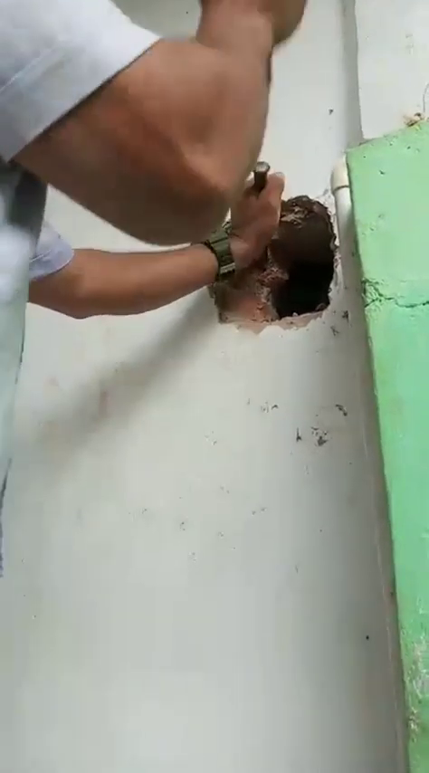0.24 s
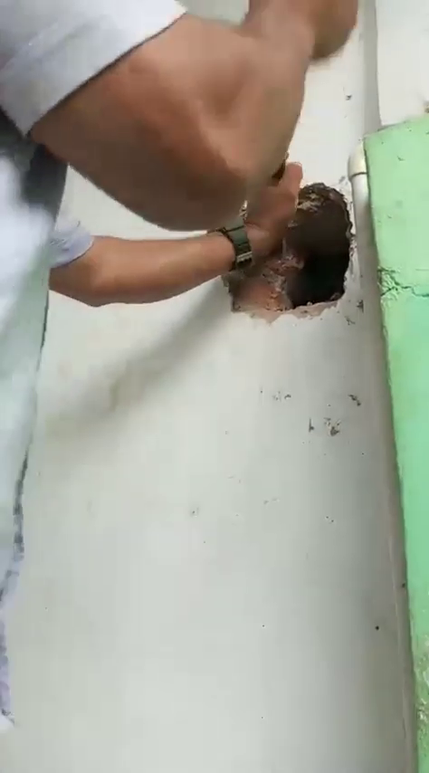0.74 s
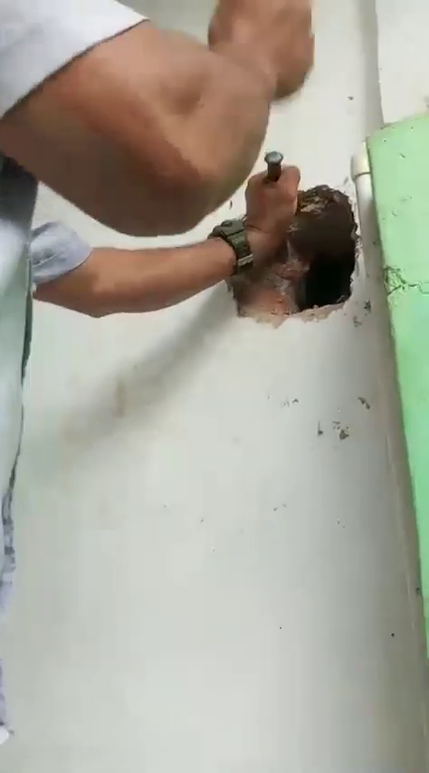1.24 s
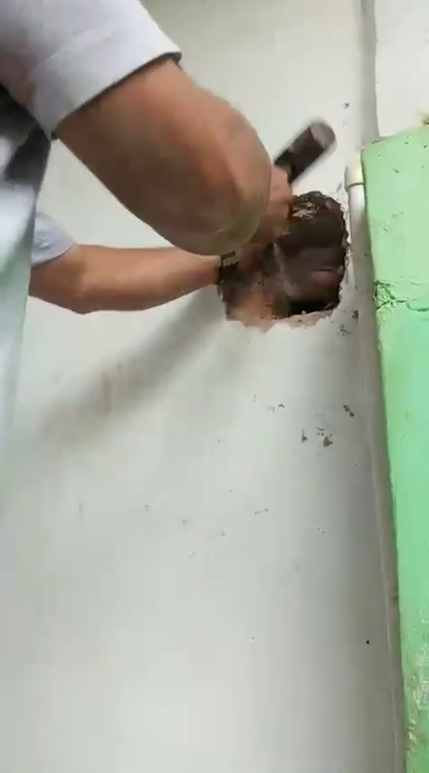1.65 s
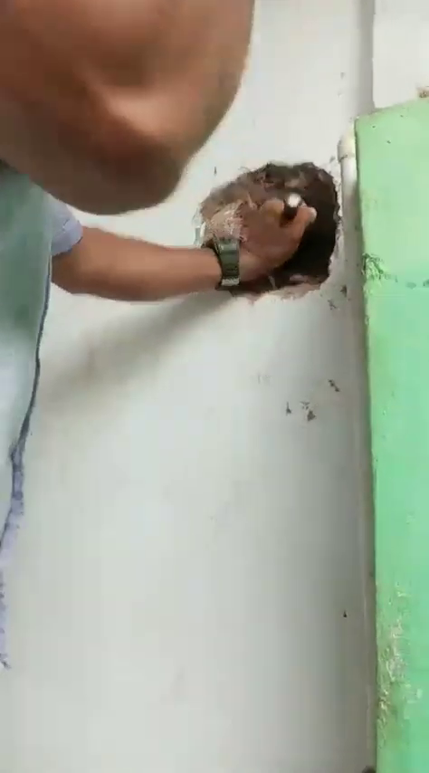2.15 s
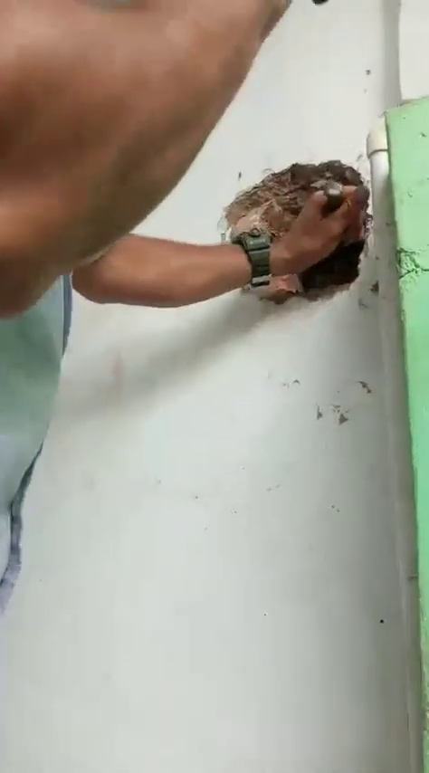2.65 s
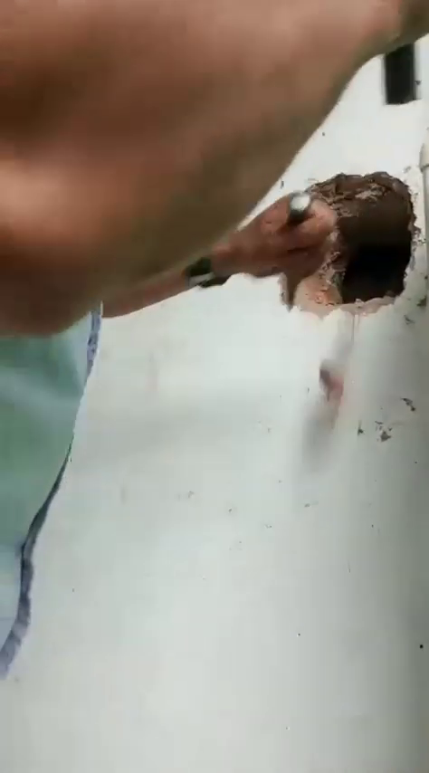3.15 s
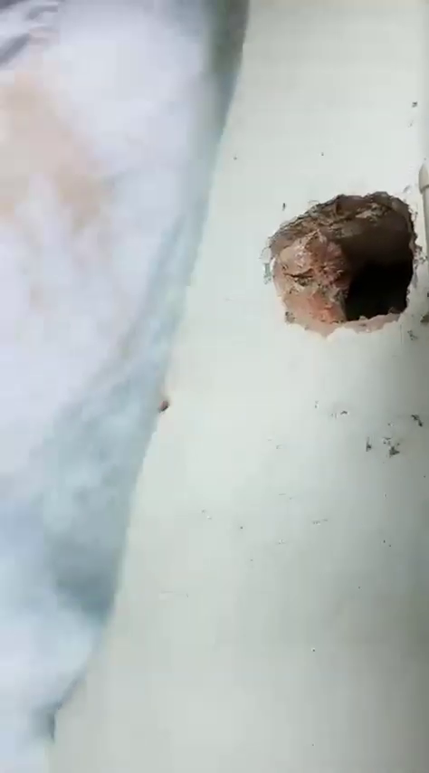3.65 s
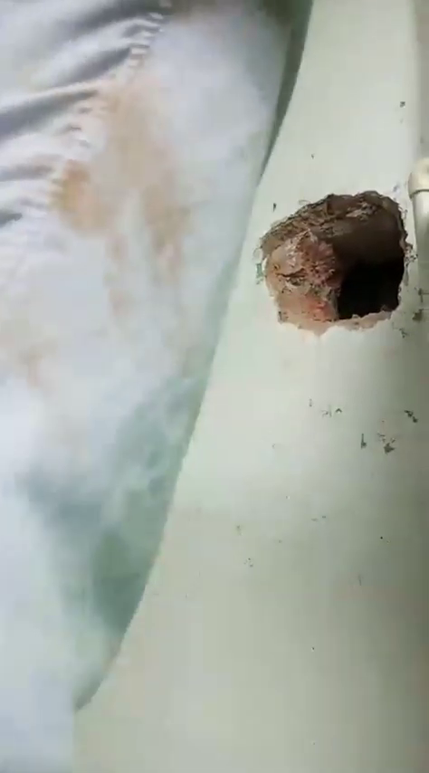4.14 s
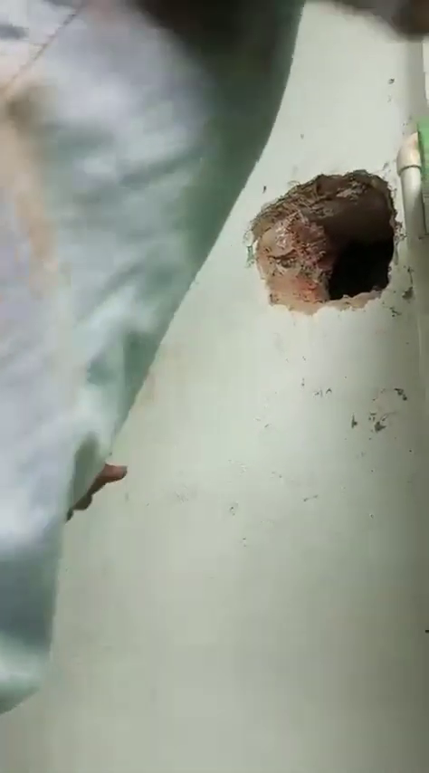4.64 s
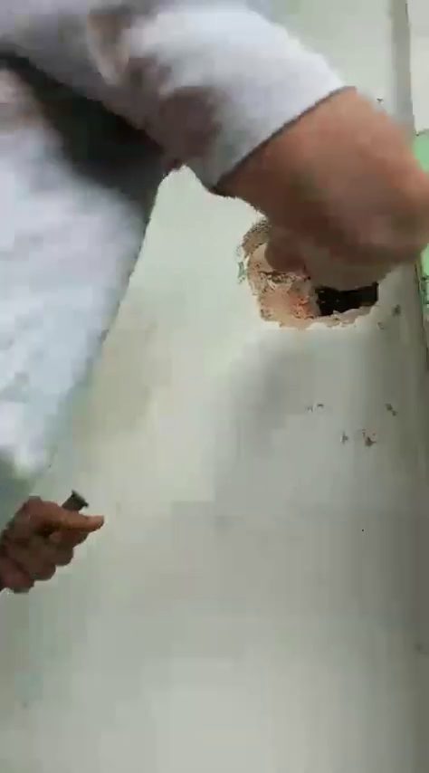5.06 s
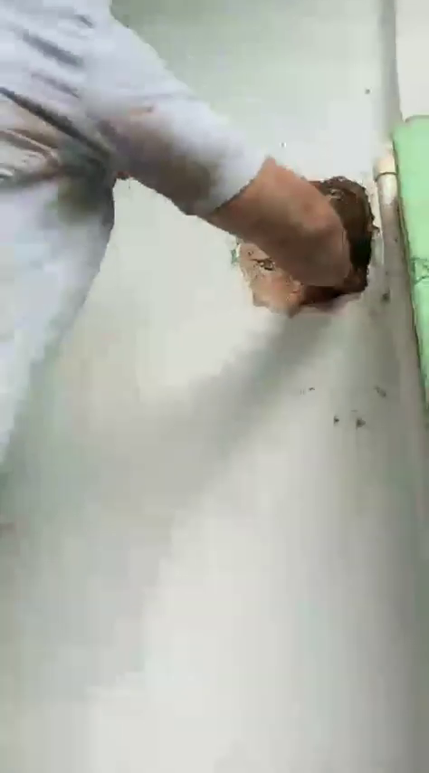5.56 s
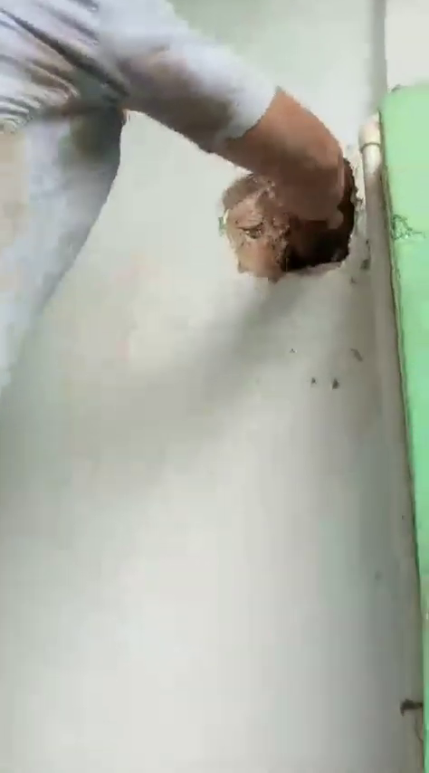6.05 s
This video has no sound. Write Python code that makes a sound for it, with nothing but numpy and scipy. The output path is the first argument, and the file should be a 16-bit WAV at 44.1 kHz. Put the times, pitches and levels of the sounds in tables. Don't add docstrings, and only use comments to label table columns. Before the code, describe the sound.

In a bare echoing room, a hammer strikes a steel chisel four times, about half a second apart, each a hard crack with a brief ring, hollow wall boom and crumbling plaster. Chips fall and the chisel ticks. Then the tools knock down loudly on the floor and a hand softly rakes rubble, over a faint low motor hum. Close phone microphone, blows squashed.

```python
import sys
import numpy as np
from scipy import signal
from scipy.fft import rfft, irfft, next_fast_len
from scipy.io import wavfile
from scipy.ndimage import uniform_filter1d, map_coordinates

SR = 44100
rng = np.random.default_rng(int(sys.argv[2]) if len(sys.argv) > 2 else 0)


def store_pcm(level_fs):
    pcm = np.round(np.clip(level_fs, -1, 1) * 32767).astype(np.int16)
    wavfile.write(sys.argv[1], SR, np.atleast_2d(pcm).T)


def ratio_of_db(decibels):
    return 10 ** (np.asarray(decibels, float) / 20)


N = 278263

# (time [s], peak [dB], wall boom [dB], steel ring [dB], crumble [dB])
BLOWS = [
    (1.018, -8.5, 2, 3.5, 0.5),
    (1.5264, -5, 3.5, -1, -1),
    (2.0279, -2, 2, -3.5, -2.5),
    (2.5412, -8, -3, 1, 1.5),
]
# (time [s], peak [dB], centre [Hz], width [octaves], t60 [s])
DROPS = [
    (4.111, 4, 3000, 0.6, 0.04),
    (4.1142, 0, 3600, 0.47, 0.068),
    (4.1182, 6.5, 3030, 0.87, 0.29),
    (4.2946, -1, 1210, 1.3, 0.22),
    (4.3, -2, 990, 1.6, 0.39),
    (4.4205, -2, 1166, 1.4, 0.097),
    (4.426, 1.5, 1200, 1.45, 0.37),
]


def unit(x):
    return x / np.sqrt(np.mean(x ** 2) + 1e-20)


def along(points, hz):
    f, v = np.transpose(points)
    return np.interp(np.log(hz + 1), np.log(f + 1), v)


def filtered(x, response):
    m = next_fast_len(x.shape[-1] + 2048)
    return irfft(rfft(x, m) * response(np.fft.rfftfreq(m, 1 / SR)), m)[:x.shape[-1]]


def coloured(x, points):
    return unit(filtered(x, lambda hz: ratio_of_db(along(points, hz))))


def add(track, s, sound):
    part = track[round(s * SR):][:len(sound)]
    part += sound[:len(part)]


def rise(t, tau_s):
    return 1 - np.exp(-t / tau_s)


def decay(t, db, t60_s):
    return ratio_of_db(db - 60 * t / t60_s)


def sine(hz, t):
    return np.sin(2 * np.pi * hz * t)


def wobble(rate):
    return map_coordinates(rng.standard_normal(int(N * rate / SR) + 4), [np.arange(N) * rate / SR])


def dying(times, t60_s):
    t = np.arange(N) / SR
    return sum((t >= s) * decay((t - s).clip(0), db, t60_s) for s, db in times)


def ring(modes, t, spread_db, damp_hz):
    steps = rng.standard_normal((len(modes), len(t)))
    wander = np.cumsum(steps, axis=1) * np.sqrt(2 * np.pi * damp_hz / SR)
    out = np.zeros(len(t))
    for (hz, db, t60), phase in zip(modes, wander):
        level_db = db + spread_db * rng.standard_normal()
        out += decay(t, level_db, t60) * np.sin(2 * np.pi * hz * t + phase)
    return out


def tail(colour, hold_s):
    # (frequency [Hz], t60 [s])
    room = [(80, 0.36), (200, 0.59), (600, 0.52), (2000, 0.34), (5000, 0.34), (9000, 0.29), (15000, 0.25)]
    hz, t, z = signal.stft(rng.standard_normal(SR * 2 // 3), SR, nperseg=256)
    fall = decay((t - hold_s).clip(0), 0, along(room, hz)[:, None])
    return coloured(signal.istft(z * fall, SR, nperseg=256)[1], colour)


def knocks(events, click_s, wet_db):
    out, t = np.zeros(N), np.arange(SR // 5) / SR
    for s, db, centre_hz, octaves, t60 in events:
        burst = unit(filtered(rng.standard_normal(len(t)),
                              lambda hz: np.exp(-(np.log2((hz + 1) / centre_hz) / octaves) ** 2)))
        shape = (decay(t, 0, click_s) + decay(t, wet_db, t60)) * rise(t, 0.00075)
        add(out, s, ratio_of_db(db - 5.5) * burst * shape)
    return filtered(out, lambda hz: 1 / (1 + (170 / (hz + 1)) ** 4) / (1 + (hz / 8000) ** 6) ** .5)


def hammer():
    # (frequency [Hz], level [dB], t60 [s])
    wall_modes = [(186, -10, 0.54), (546, -12, 0.4), (1043, -15, 0.35), (270.3, -6.5, 0.47),
                  (342.3, -7.5, 0.45), (383, -9, 0.54), (426, -5.5, 0.48), (462, -8, 0.49), (512, -7, 0.46),
                  (619, -14, 0.51), (752, -13, 0.52), (689, -14.5, .4), (921, -13, 0.34)]
    # (frequency [Hz], level [dB], split [Hz], t60 [s])
    panel_modes = [(156.6, 1.5, 7.5, .6), (237.2, 5.5, 4, .32), (806, -4, 5, .27)]
    # (frequency [Hz], level [dB], t60 [s])
    shank = [(4570, 12.5, 0.058), (5540, 6.5, 0.056), (10300, -15, 0.57), (10900, -38.5, 0.3)]
    # (frequency [Hz], density [dB per Hz])
    struck = [
        [(880, -12), (1500, -10.5), (1940, -10), (2120, -2.5), (3090, -8), (3690, -6.5), (5120, -6),
         (7920, -25), (10200, -16.5), (12100, -22.5), (16000, -16)],
        [(880, -40.5), (1500, -8.5), (2140, -1.5), (2560, -8.5), (4330, -3.5), (9190, -23.5), (10100, -4),
         (11200, -16.5), (11500, -31.5), (14600, -19), (16000, -14)],
        [(880, -28.5), (1500, -4), (1880, -6), (2100, -1), (2490, -6), (4000, -4.5), (4550, -0.5), (7540, -20),
         (10000, -15.5), (13100, -23.5), (16000, -8.5)],
        [(880, -5.5), (1500, -7.5), (1590, -7), (2120, -4), (2940, -3), (3450, -9.5), (4830, -8), (5830, -3),
         (7460, -21.5), (12900, -20), (16000, -20.5)],
    ]
    # (frequency [Hz], density [dB per Hz])
    thud = [(29, -77), (50, -25), (118, -15), (155, -9), (204, -11.5), (239, -11), (487, -14.5),
            (786, -16.5), (1250, -22), (2080, -59), (3520, -120)]
    tail_cut_s = [.31, .292, .3, .55]
    knock_hz, knock_db, knock_t60_s = 1296, -12, 0.017
    slap_s, slap_hz, slap_db, slap_t60_s = .0725, 330, 9, .018

    out, t = np.zeros(N), np.arange(SR * 3 // 5) / SR
    for (s, db, boom_db, steel_db, crumble_db), colour, cut_s in zip(BLOWS, struck, tail_cut_s):
        crack = filtered(rng.standard_normal(len(t)), lambda hz: 1 / (1 + ((hz - 4600) / 2200) ** 2))
        crack = crack * decay(t, 4.5, 0.016) * rise(t, .0008)

        spurts = ratio_of_db(2.8 * unit(uniform_filter1d(rng.standard_normal(len(t)), size=90)))
        crumble = tail(colour, hold_s=0.051)[:len(t)] * rise(t, 0.00031)
        crumble = ratio_of_db(crumble_db - 19) * spurts * crumble

        wall = ratio_of_db(4.5) * ring(wall_modes, t, 2.1, damp_hz=6) * rise(t, 0.045)
        wall += ratio_of_db(-12.5) * tail(thud, hold_s=0.063)[:len(t)]
        panel = sum(decay(t, level, t60) * np.sin(np.pi * split * t) * sine(hz, t)
                    for hz, level, split, t60 in panel_modes)
        late = (t - slap_s).clip(0)
        slap = decay(late, slap_db, slap_t60_s) * sine(slap_hz, late)
        boom = ratio_of_db(boom_db - 9.5) * (wall + slap + ratio_of_db(6) * panel) * rise(t, 0.0056)

        knock = decay(t, knock_db, knock_t60_s) * sine(knock_hz, t)
        steel = ratio_of_db(steel_db - 16.5) * ring(shank, t, 1.3, damp_hz=354)
        gate = ratio_of_db(-16 * np.clip((t - cut_s) / 0.00586, 0, 1))
        add(out, s, ratio_of_db(db + 2.5) * gate * (crack + crumble + knock + boom + steel))
    return out


def chisel():
    # (time [s], peak [dB], low mode [dB], high mode [dB], high mode [Hz])
    taps = [(0.0209, -17, -8, -9, 5540), (0.1231, -27.5, -7, -6, 5470), (0.1644, -27.5, -8, -6.5, 5430),
            (0.221, -31, 3, 1, 5420), (0.3282, -34, -20, -7, 5380), (0.3716, -20, -17, -7.5, 5430),
            (0.9128, -16, -29, -16.5, 5500), (0.9594, -40.5, -26, 4, 5580), (2.6994, -17, -11.5, -17, 5400),
            (2.9144, -37, -21, 0.5, 5490), (3.2495, -26, -14, -9, 5450), (3.2605, -22.5, -11.5, -14, 5430),
            (3.2869, -24, -6.5, -10, 5500), (3.3, -26.5, -14, -4.5, 5750), (3.4805, -40, -3, -12, 5560),
            (3.5149, -20.5, -6.5, -21, 5606), (3.5294, -29.5, 0.5, -12, 5640),
            (3.5463, -22.5, -5.5, -9.5, 5520), (3.5663, -23.5, -10, -15, 5450),
            (3.4988, -31, -4, -20, 5680), (3.5901, -33.5, -6, -14, 5540), (3.615, -39, -7, -14, 5480)]
    # (frequency [Hz], t60 [s])
    bending = [(2115, 0.11), (5440, 0.051)]
    # (frequency [Hz], level [dB], t60 [s])
    handle = [(256.2, -9, 0.4), (632, 1, 0.073), (1303, 7, 0.018), (1520, -8.5, 0.09), (1920, -12, 0.092),
              (2150, -9, 0.076), (2430, -13, .15), (2845, -16, .15)]
    # (frequency [Hz], level [dB], t60 [s])
    head = [(2550, -6.5, 0.24), (4700, -7, 0.13), (6400, -10, 0.25)]
    # (frequency [Hz], level [dB], t60 [s])
    clink = [(1739, -2, 0.28), (2294, 8, .087), (3100, -15, 0.47), (4021, -10.5, 0.3), (5270, -19, .16),
             (10300, -11.5, 0.13)]
    # (frequency [Hz], level [dB], t60 [s])
    rock = [(1739, -16, .3), (4021, -10, 0.29)]
    clink_s, rock_s, clink_db = 4.4995, 4.526, -26

    out, t = np.zeros(N), np.arange(SR // 3) / SR
    for s, db, *levels, high_hz in taps:
        shift = high_hz / bending[1][0]
        modes = [(hz * shift, level, t60) for (hz, t60), level in zip(bending, levels)]
        tick = filtered(rng.standard_normal(len(t)), lambda hz: 1 / (1 + ((hz - 4000) / 2500) ** 4))
        tick = tick * decay(t, -4, 0.0045) * rise(t, 0.00027)
        add(out, s, ratio_of_db(db + 2.5) * (ring(modes, t, 0, damp_hz=24.8) * rise(t, 0.0017) + tick))
    for s, db, *_ in DROPS[3:]:
        add(out, s, ratio_of_db(db - 15) * ring(handle, t, 1.2, damp_hz=30))
    add(out, DROPS[2][0], ratio_of_db(-13.5) * ring(head, t, 0, damp_hz=90))
    add(out, clink_s, ratio_of_db(clink_db) * ring(clink, t, 0, damp_hz=4) * rise(t, 0.002))
    add(out, rock_s, ratio_of_db(clink_db) * ring(rock, t, 0, damp_hz=5) * rise(t, 0.004))
    return filtered(out, lambda hz: 1 / (1 + (170 / (hz + 1)) ** 4))


def chips():
    # (time [s], peak [dB], centre [Hz])
    falling = [(0.1225, -27, 1500), (0.217, -26, 1500), (0.432, -30, 2160), (0.438, -28, 900),
               (0.471, -15, 800), (0.48, -9.5, 3300), (0.487, -6, 2180), (0.794, -27.5, 2460),
               (0.88, -24, 2280), (0.9845, -19, 2140), (1.839, -25, 736), (2.754, -19, 2950),
               (2.81, -21, 2250), (2.986, -26, 3060), (3.018, -8.5, 4630), (3.115, -16.5, 3970),
               (3.146, -31, 6300), (3.154, -25, 3600), (3.181, -24, 4570), (3.2014, -24, 4500),
               (3.263, -23.5, 3500), (3.232, -22, 3630), (3.384, -25.5, 3400), (3.44, -33, 3000),
               (3.85, -43, 4300), (3.873, -33.5, 2700), (4.095, -26, 4500), (4.032, -38.5, 3440),
               (4.0914, -33, 1016), (4.251, -25, 3950), (4.385, -17, 4300), (4.469, -6.5, 1290),
               (4.896, -27, 2710), (5.082, -31.5, 2525), (5.135, -27, 805), (5.139, -25, 4000),
               (5.32, -42, 4730), (4.629, -37, 3010), (4.703, -27, 3600), (5.527, -35, 2630),
               (5.805, -23.5, 3180), (5.959, -33, 2690), (5.992, -28, 2210), (6.024, -30, 5500),
               (6.177, -31, 3540)]
    # (time [s], peak [dB], centre [Hz], width [octaves], t60 [s])
    slivers = [(2.6, -7, 1800, 2.4, 0.021), (2.8, -20, 2600, 0.66, 0.041)]
    # (time [s], peak [dB],
    # centre [Hz], width [octaves], t60 [s])
    clods = [(0.4935, -5, 2100, 0.7, 0.13), (0.634, -27.5, 1500, 0.59, 0.34), (0.655, -26, 1500, 0.49, .2),
             (5.17, -33, 4100, 0.28, .4), (6.18, -32, 3700, .3, .25), (4.13, -21, 1010, .8, 0.35),
             (4.1085, -20, 4000, 0.6, .03), (4.199, -22.5, 4200, .5, .05), (4.662, -29, 2900, 0.35, 0.24),
             (4.674, -21, 1380, 0.57, 0.25)]
    octaves, t60_s = 0.81, 0.059
    small = [(s, db, hz, octaves, t60_s) for s, db, hz in falling]
    return knocks([*small, *slivers, *clods], click_s=0.009, wet_db=-6)


def snaps():
    # (time [s], peak [dB], frequency [Hz])
    contacts = [(0.482, -17, 3200), (0.4895, -9, 2100), (0.4954, -5, 3700), (0.5265, -18, 3400),
                (0.2245, -26, 1800), (0.9118, -25, 4600), (0.9848, -24, 2600), (3.0186, -8, 4600),
                (3.0203, -8, 3600), (3.1152, -19, 4400), (3.1545, -25, 3400), (3.1825, -27, 4800),
                (3.2335, -34, 3600), (3.2618, -24, 4200), (3.3148, -28, 2800), (4.1114, 1, 3400),
                (4.115, -1, 4200), (4.1184, -1, 3280), (4.6735, -25, 2000)]
    cycles = 8
    out, t = np.zeros(N), np.arange(SR // 100) / SR
    for s, db, hz in contacts:
        add(out, s, decay(t, db + 6, cycles / hz) * sine(hz, t) * rise(t, 1 / (2.8 * hz)))
    return filtered(out, lambda hz: 1 / (1 + (1500 / (hz + 1)) ** 4) / (1 + (hz / 6500) ** 4))


def splinters():
    # (time [s], peak [dB], frequency [Hz], t60 [s])
    pings = [(.794, -29, 2284, .03), (3.1376, -26.5, 3550, .04), (3.154, -27.5, 3200, .03),
             (3.2007, -22, 3516, 0.043), (3.314, -27, 2670, 0.043), (3.4017, -31, 2225, 0.057),
             (4.03, -36, 3540, 0.064), (4.128, -13, 2524, 0.064), (4.308, -22.5, 3920, 0.034),
             (4.476, -27, 3800, .04), (5.396, -45, 2080, 0.15), (5.528, -36.5, 2550, .05),
             (5.578, -40, 2910, 0.045), (5.724, -38.5, 4260, .08), (5.86, -38, 2340, .04),
             (5.961, -34.5, 2680, 0.044), (5.984, -35, 2274, .08), (5.995, -34.5, 3790, 0.054),
             (6.05, -29.5, 684, 0.088), (4.192, -23, 2494, 0.07), (3.146, -32.5, 6400, .09),
             (6.19, -31, 3450, 0.11)]
    # (start [s], end [s], frequency [Hz], level [dB])
    thin_notes = [(5.026, 5.058, 4900, -56), (5.44, 5.53, 2480, -58), (5.45, 5.51, 2980, -61),
                  (5.53, 5.62, 6260, -62), (5.53, 5.63, 5470, -66), (5.608, 5.72, 4610, -59.5),
                  (5.646, 5.73, 3440, -57.5), (5.66, 5.747, 2210, -56), (5.771, 5.85, 846, -54),
                  (3.72, 3.79, 767, -67), (5.45, 5.49, 1050, -69), (0.699, 0.775, 800, -57)]
    out, t = np.zeros(N), np.arange(SR // 5) / SR
    for s, db, hz, t60 in pings:
        add(out, s, ring([(hz, db, t60)], t, 0, damp_hz=60) * rise(t, .001))
    for start, end, hz, db in thin_notes:
        swell = np.sin(np.pi * np.clip(t / (end - start), 0, 1)) ** .5
        add(out, start, np.sqrt(2) * swell * ring([(hz, db, 3)], t, 0, damp_hz=16))
    return out


def gravel(spectrum, grains_db, patchy_db):
    hits = (rng.random(N) < 300 / SR) * rng.standard_normal(N)
    grains = hits * ratio_of_db(2.9 * rng.exponential(size=N).clip(0, 2))
    z = signal.stft(rng.standard_normal(N) + ratio_of_db(grains_db) * unit(grains), nperseg=512)[2]
    field = uniform_filter1d(rng.standard_normal(z.shape), size=2, axis=0)
    field = uniform_filter1d(field, size=14, axis=1)
    rough = signal.istft(z * ratio_of_db(patchy_db * unit(field)), nperseg=512)[1][:N]
    return coloured(rough, spectrum)


def rubble():
    # (hardest time [s], level [dB], rise [s], fall [s], coarseness [dB])
    drags = [(0.028, -30, 0.075, 0.12, -3), (0.125, -42, 0.011, 0.075, 9), (0.222, -42, 0.0057, 0.085, 16),
             (0.494, -19.5, 0.063, 0.067, -3), (0.655, -43.5, 0.052, 0.063, -5),
             (1.0, -41, 0.33, 0.016, -6), (1.4, -53.5, 0.11, 0.082, 11.5), (1.511, -43, 0.017, 0.036, -10),
             (1.95, -39.5, 0.35, 0.13, -0.5), (2.40, -53.5, 0.31, 0.21, 16), (1.3, -50.5, .1, 0.091, -19),
             (2.33, -47, 0.14, 0.078, -24), (0.52, -34, .03, 0.058, -4), (2.82, -39, 0.27, 0.18, -1),
             (3.03, -33, 0.11, 0.089, -3.5), (3.15, -40, 0.059, 0.33, -28), (3.29, -46, 0.18, 0.11, -9),
             (3.546, -42, 0.19, 0.12, -16), (4.541, -38.5, 0.3, 0.059, 7.5),
             (4.685, -34, 0.037, 0.054, -15), (5.1, -50.5, 0.024, 0.132, -29), (5.2, -39, 0.11, 0.09, -0.5),
             (3.9, -55.5, 0.026, 0.074, -22), (4.06, -49, 0.026, 0.11, -26), (4.89, -52, 0.028, .06, -17),
             (5.735, -51.5, 0.026, .08, -29), (5.53, -50, 0.017, 0.23, -13),
             (5.82, -38.5, 0.12, 0.13, -7.5), (5.992, -37.5, 0.025, 0.2, -1),
             (6.06, -42.5, 0.015, 0.09, 7.5), (6.202, -37.5, 0.034, 0.066, -63.5)]
    # (time [s], level [dB])
    running = [(0, -69.5), (.35, -51.5), (.8, -48.5), (1.35, -48), (1.9, -45.5), (2.4, -50.5), (2.9, -52.5),
               (3.45, -47), (3.75, -49), (4.0, -53), (4.6, -51.5), (4.75, -46), (5.03, -53.5), (5.4, -52.5),
               (5.7, -61), (5.93, -69.5), (6.15, -66.5), (6.31, -84)]
    # (time [s], peak [dB])
    dust_puffs = [(0.0204, -60), (0.1408, -36.5), (0.2184, -62), (0.2538, -45.5), (0.4424, -32),
                  (0.6335, -41), (0.9766, -33.5), (1.3952, -31.5), (1.9715, -24), (2.4848, -34.5),
                  (2.7551, -22.5), (2.9836, -29.5), (3.018, -23.5), (3.1153, -21), (3.263, -33),
                  (3.8096, -33.5), (4.0297, -37.5), (4.0954, -30.5), (4.1113, -21), (4.3859, -23.5),
                  (4.6299, -26.5), (4.7032, -28), (4.8963, -36), (5.0255, -35.5), (5.0836, -34),
                  (5.122, -39), (5.2697, -42), (5.477, -39), (5.577, -35), (5.715, -41),
                  (5.813, -36),
        (5.9455, -44),
        (6.024, -25.5),
        (6.1742, -32),
    ]
    # (frequency [Hz], density [dB per Hz])
    grit_colour = [(820, -23.5), (1400, -13), (1800, -5.5), (2400, -5), (3300, -8), (4290, -58),
                   (7260, -120)]
    # (frequency [Hz], density [dB per Hz])
    lump_colour = [(190, -23.5), (320, -5), (362, -4.5), (395, -4), (1380, -8), (1800, -23), (2340, -29.5),
                   (3960, -120)]
    # (frequency [Hz], density [dB per Hz])
    sand_colour = [(1820, -33.5), (3100, -11), (3560, 3.5), (5560, -3), (6800, -10.5), (8840, -32),
                   (15000, -120)]
    # (frequency [Hz], density [dB per Hz])
    dust_colour = [(3820, -47.5), (6500, -11.5), (7640, -12), (8620, -8.5), (9260, -5), (12900, -14.5),
                   (15100, -12), (16000, -7.5)]

    t = np.arange(N) / SR
    s, db, rise_s, fall_s, coarse_db = np.transpose(drags)[:, :, None]
    strokes = ratio_of_db(db - 20 * np.maximum((s - t) / rise_s, (t - s) / fall_s))
    stroke = strokes.sum(axis=0)
    lump_stroke = (strokes * ratio_of_db(coarse_db)).sum(axis=0)
    sand_stroke = (strokes * ratio_of_db(-5 - 0.12 * coarse_db)).sum(axis=0)

    when_s, level_db = np.transpose(running)
    trickle = ratio_of_db(np.interp(t, when_s, level_db) + 0.94 * wobble(9))
    puff_events = dust_puffs
    snap, drift = dying(puff_events, .03), dying(puff_events, 0.36)
    puffs = ratio_of_db(-7.5) * (snap + ratio_of_db(-8) * drift)

    grit = stroke + trickle
    lumps = lump_stroke + ratio_of_db(-19.5) * trickle
    sand = sand_stroke + ratio_of_db(-7) * trickle + ratio_of_db(-9) * puffs
    dust = ratio_of_db(-13.5) * stroke + ratio_of_db(-11.5) * trickle + puffs
    out = grit * gravel(grit_colour, grains_db=-7, patchy_db=3)
    out += lumps * gravel(lump_colour, grains_db=-7, patchy_db=2)
    out += sand * gravel(sand_colour, grains_db=-7, patchy_db=4)
    out += dust * gravel(dust_colour, grains_db=-8, patchy_db=4)
    return ratio_of_db(-3.5) * out


def feet():
    # (time [s], peak [dB], centre [Hz], width [octaves])
    shuffles = [(0.222, -29, 165, 0.2), (3.36, -48, 250, 0.27), (3.49, -39, 290, 0.43),
                (3.56, -44, 240, 0.35), (3.82, -46, 280, 0.49), (4.05, -41, 322, 0.34),
                (4.296, -22.5, 250, 0.21), (4.43, -25, 265, .25), (4.632, -34, 199, .5),
                (4.68, -39, 334, 0.43), (.3, -38, 280, 0.54), (5.04, -48, 300, 0.46),
                (5.78, -41, 300, 0.52), (5.15, -36.5, 600, .6), (6.09, -36.5, 900, 0.74)]
    t60_s = 0.18
    return knocks([(*row, t60_s) for row in shuffles], click_s=0.071, wet_db=-5)


def motor():
    # (start [s], end [s], frequency [Hz], level [dB])
    tones = [(0.08, 0.17, 149, -52), (0.22, 0.61, 148, -48), (0.675, 0.926, 180.7, -47.5),
             (0.72, 0.945, 149.8, -49), (2.96, 3.24, 156.6, -52), (3.304, 4.108, 143, -48),
             (3.302, 4.11, 164.1, -46.5), (4.176, 4.667, 156.3, -47), (4.807, 5.042, 150.4, -48),
             (5.055, 5.137, 148, -42.5), (5.13, 5.598, 146.6, -39), (5.587, 5.937, 146.5, -36),
             (5.94, 6.058, 143.8, -46)]
    # (frequency [Hz], density [dB per Hz])
    drone_colour = [(110, -46), (132, 2), (142, -2), (152, -1), (163, -1), (178, 0), (205, -57.5)]
    # (frequency [Hz], density [dB per Hz])
    upper_colour = [(170, -34.5), (195, 4.5), (260, 0), (320, -11), (400, -49)]
    # (frequency [Hz], density [dB per Hz])
    rumble_colour = [(15, -67.5), (25, -15.5), (43, -27), (108, -12), (128, -13.5), (170, -33.5),
                     (280, -120)]
    edge_s, wobble_db, fade_s, glow_t60_s = 0.044, 2, 6, 1.13

    t = np.arange(N) / SR
    hums = np.zeros(N)
    for start, end, hz, db in tones:
        gate = np.clip(np.minimum(t - start, end - t) / edge_s + .5, 0, 1)
        hums += ratio_of_db(db + wobble_db * wobble(7.8)) * gate * np.sqrt(2) * sine(hz, t)

    blows = [(s, 0) for s, *_ in BLOWS]
    landings = [(s, -18) for s, *_ in DROPS[3::2]]
    glow = dying(blows + landings + [(0, -15.5)], glow_t60_s)
    fade = ratio_of_db(-70 * (t - fade_s).clip(0))
    low = (ratio_of_db(-57.5) * fade + ratio_of_db(-30.5) * glow) * coloured(rng.standard_normal(N), drone_colour)
    upper = (ratio_of_db(-60.5) + ratio_of_db(-26.5) * glow) * coloured(rng.standard_normal(N), upper_colour)

    swell_db = 5.4 * np.exp(-((t - 4.55) / 0.4) ** 2) - 31 * (t - 5.9).clip(0)
    rumble_gain = ratio_of_db(-53.5 + swell_db + 1.5 * wobble(5))
    return hums + low + upper + rumble_gain * coloured(rng.standard_normal(N), rumble_colour)


def scene():
    tools = hammer() + chisel() + knocks(DROPS, click_s=0.0035, wet_db=-15.5)
    debris = chips() + snaps() + splinters() + rubble()
    return (tools + debris + feet() + motor())[None]


def hushed(x):
    # (frequency [Hz], level [dB per bin])
    hush = [(300, -94), (1000, -81), (2300, -77), (4500, -78), (12000, -92.5)]
    depth_db = -14
    hz, _, z = signal.stft(x, SR, nperseg=512)
    power = uniform_filter1d(np.abs(z) ** 2, size=3, axis=0)
    power = np.abs(uniform_filter1d(power, size=6, axis=1))
    floor = ratio_of_db(2 * along(hush, hz))[:, None]
    gain = np.maximum(power / (power + floor), ratio_of_db(depth_db))
    return signal.istft(z * gain, SR, nperseg=512)[1][:N]


def band_limit(x):
    return signal.sosfilt(signal.butter(12, 17010, fs=SR, output="sos"), x)


def record(dry):
    ceiling_db, top_hz, low_cut_hz = -10, 15900, 35
    level = np.sqrt(np.abs(uniform_filter1d(dry[0] ** 2, size=800, origin=390)) + 1e-12)
    held = dry[0] / (1 + (level / ratio_of_db(ceiling_db)) ** 3) ** (1 / 3)
    held = filtered(hushed(held), lambda hz: (hz < top_hz) / (1 + (low_cut_hz / (hz + 1)) ** 2))
    clipped = held / (1 + np.abs(held) ** 10) ** .1
    return band_limit(clipped[None])


dry = scene()
out = record(dry)
store_pcm(out)
```